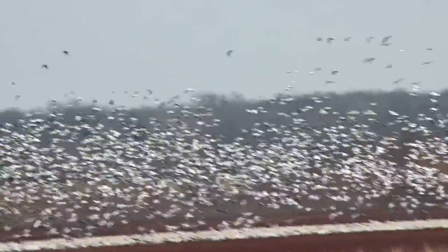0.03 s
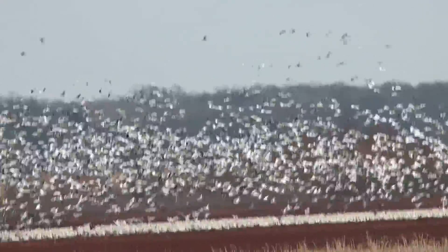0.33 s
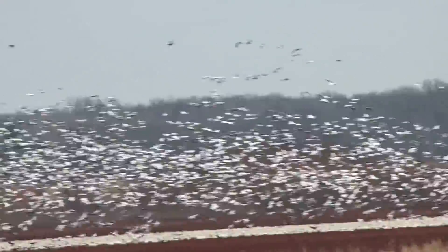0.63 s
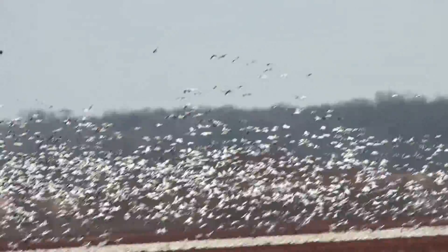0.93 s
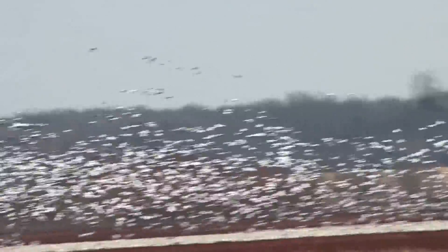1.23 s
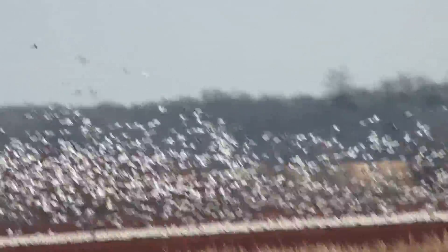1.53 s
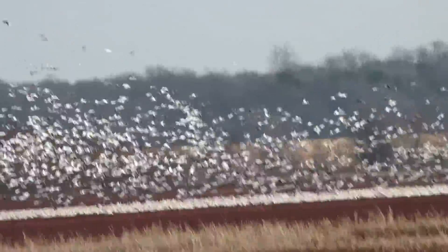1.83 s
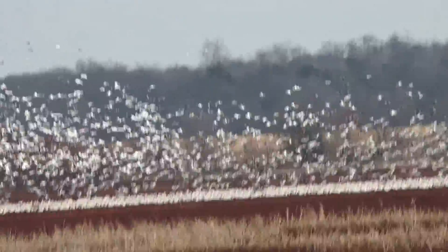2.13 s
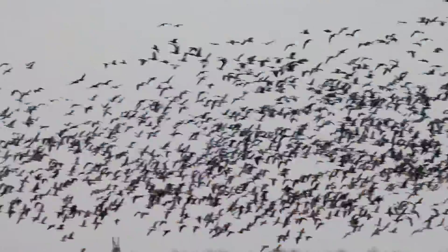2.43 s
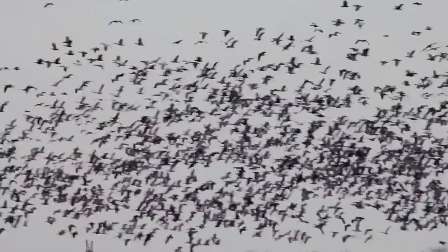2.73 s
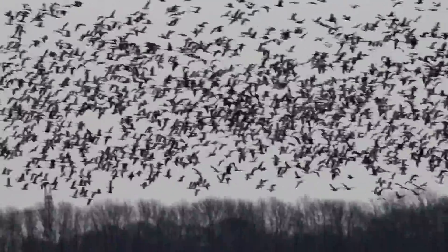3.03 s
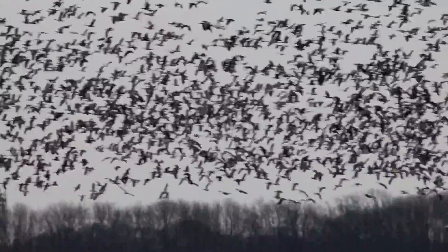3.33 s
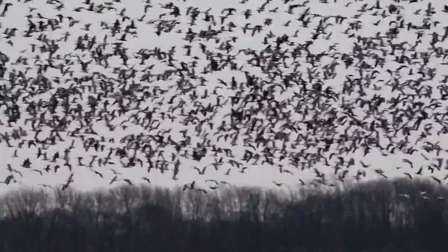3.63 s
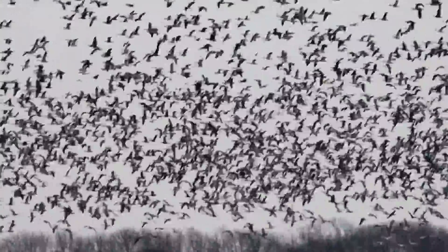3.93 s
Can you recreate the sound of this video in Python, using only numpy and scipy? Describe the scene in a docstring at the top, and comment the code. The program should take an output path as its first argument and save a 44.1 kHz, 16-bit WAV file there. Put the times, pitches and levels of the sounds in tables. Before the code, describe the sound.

Hundreds of geese yelp and honk outdoors, far away at first, with faint road noise and tyre whine. Then the flock is abruptly close and loud, above a low engine drone and a few wind gusts on the microphone.

```python
"""Open fields under a huge flock of snow geese, heard from two places with a short silence between.
Far off, hundreds of harmonic yelps merge into a soft wash, with faint peeps of small birds, road noise
and the sinking tyre whine of a passing vehicle. Nearly overhead, the calls add up to a loud roar, mostly
from the right, over the firing tones of an engine and light wind on the microphone."""
import sys
import numpy as np
from scipy import signal
from scipy.fft import rfft, irfft
from scipy.io import wavfile
from scipy.ndimage import uniform_filter1d

SR = 44100
rng = np.random.default_rng(int(sys.argv[2]) if len(sys.argv) > 2 else 0)


def wav_record(signal):
    """Record a signal, one row per channel, as 16-bit PCM in the file named by sys.argv[1]."""
    frames = np.transpose(np.atleast_2d(signal))
    bounded = np.clip(frames, -1, 1)
    # unit amplitude maps onto the largest positive 16-bit level
    quanta = np.round(bounded * 32767).astype(np.int16)
    wavfile.write(sys.argv[1], SR, quanta)


N = 176400
T, FREQS = np.arange(N) / SR, np.maximum(np.fft.rfftfreq(N, 1 / SR), 1)
FAR_END_S, NEAR_START_S = 2.459, 2.527
GOOSE_HZ, CALL_S, RASP_HZ, BLUR_HZ = 721.7, .085, 400, 3000


def call(length_s, hz, arch, slide, rasp):
    """Frequency modulation: phase and envelope of one call whose pitch arches, slides and jitters."""
    u = np.linspace(0, 1, max(int(length_s * SR), 2))
    hump = np.sin(np.pi * u ** 0.699)  # quick rise, slower fall
    pitch = hz * (1 + arch * (hump - 1) + slide * (u - .5) + .016 * rasp[:len(u)])
    return 2 * np.pi * np.cumsum(pitch) / SR, hump


def flock(start_s, end_s, spread_db, wash_db, count):
    """Incoherent superposition: geese at many pitches and distances blur into a flat spectrum."""
    out, rasp = np.zeros((2, 3 * N)), drift(118)
    chance, voices = rng.random((count, 3)), rng.standard_normal((count, 4))
    for k, ((when, nearness, offset), (pitch, length, arch, slide)) in enumerate(zip(chance, voices)):
        phase, envelope = call(CALL_S * np.exp(0.2526 * length), GOOSE_HZ * np.exp(.27 * pitch),
                               0.11 * (1 + .5 * arch), 0.0607 * slide, rasp[int(offset * N / 2):])
        pulses = np.sin(phase) / (1.5 - 1.414 * np.cos(phase))  # each harmonic 3 dB below the last
        at = N + int((start_s + (end_s - start_s) * (k + when) / count) * SR)
        out[k % 2, at:at + len(phase)] += pulses * envelope * from_db(spread_db * nearness ** 2)
    chorus = rfft(out[:, N:2 * N])
    power = uniform_filter1d(np.mean(np.abs(chorus) ** 2, axis=0), size=1200)
    flat = irfft(chorus / np.sqrt(np.abs(power) + 1e-6 * power.max()), N)
    flat /= flat[:, max(int(start_s * SR), 0):int(end_s * SR)].std()
    # Share of the power in distinct calls; noise stands for the rest of the flock.
    distinct = 1 / (1 + from_db(wash_db) ** 2) / (1 + (FREQS / BLUR_HZ) ** 4)
    return irfft(np.sqrt(distinct) * rfft(flat) + np.sqrt(1 - distinct) * rfft(noise()), N)


# Spectrum of the flock overhead (frequency [Hz], spectral density [dB])
NEAR_FLOCK_SPECTRUM = [(350, -79), (490, -69), (600, -60), (650, -60.5), (740, -55.5), (830, -55.5),
                       (900, -53), (1080, -58), (1400, -55), (1650, -55.5), (1850, -54), (2080, -60),
                       (2400, -62), (2700, -72), (3150, -79), (3600, -80.5), (5000, -89), (6000, -92.5),
                       (7000, -102), (10000, -117)]
# Envelopes of the whole flock and of its treble (time [s], level [dB])
NEAR_FLOCK_SWELL = [(2.55, -.5), (2.87, -2), (3.0, 0.25), (3.14, -1.1), (3.25, .8), (3.35, -0.5),
                    (3.47, -1.6), (3.7, -2), (4, -2.5)]
TREBLE_SWELL = [(2.55, -3.7), (2.8, -0.5), (3.05, -0.5), (3.17, 0.2), (3.25, -0.5), (3.34, -1.5),
                (3.48, -1.8), (3.7, 0.8), (3.87, 0.5), (4, 2)]


def near_flock(treble_hz=1900):
    """Spectral shaping: a loud, bright chorus whose treble also swells on its own."""
    chorus = flock(NEAR_START_S - CALL_S, N / SR, spread_db=12.5, wash_db=-2.5, count=1000)
    geese = stereo(chorus, NEAR_FLOCK_SPECTRUM, NEAR_FIELD)
    treble = irfft(rfft(geese) / (1 + (treble_hz / FREQS) ** 20), N)
    return swell(NEAR_FLOCK_SWELL) * (geese + (swell(TREBLE_SWELL) - 1) * treble)


# Spectrum of the distant flock (frequency [Hz], spectral density [dB])
FAR_FLOCK_SPECTRUM = [(350, -95), (500, -87), (700, -83.5), (900, -81.5), (1100, -85), (1620, -85.5),
                      (1800, -83), (1950, -83.5), (2070, -94), (2400, -99), (2700, -105), (4000, -114)]
# Its envelope (time [s], level [dB])
FAR_FLOCK_SWELL = [(0, 0), (.6, 1), (1.3, .5), (1.7, -0.5), (2.45, -0.5)]


def far_flock():
    """Attenuation with distance: the chorus arrives as a soft, dull wash."""
    chorus = flock(-CALL_S, FAR_END_S, spread_db=13.5, wash_db=0.5, count=900)
    return swell(FAR_FLOCK_SWELL) * stereo(chorus, FAR_FLOCK_SPECTRUM, FAR_FIELD)


# Calls that stand out (time [s], duration [s], second harmonic [Hz], its level on the right [dB],
# fundamental relative to it [dB], left minus right [dB])
YELPS = [(0.897, .11, 1960, -60, -3, -6), (1.135, .08, 2430, -61.5, -3, -2),
         (1.34, 0.089, 1834, -61.5, 6, -4), (1.388, 0.065, 2120, -70, -5, -3),
         (1.70, 0.08, 2600, -68, -5, -3), (1.998, 0.073, 1987, -54, -7, -1.5),
         (2.02, 0.077, 2380, -68, -5, -4), (2.586, 0.044, 1814, -40, 7, -6),
         (2.725, 0.065, 1612, -39.5, 8.5, -8), (2.73, 0.052, 1879, -38, 5.5, -7),
         (2.8, 0.056, 1825, -31, -18, -9), (2.939, 0.071, 1810, -32, 1, -10),
         (2.99, 0.056, 1725, -29.5, -3, -10), (3.19, 0.12, 2187, -33, -6, -11),
         (3.222, 0.064, 1710, -28, -2, -12), (3.31, .06, 1898, -28.5, -4, -11),
         (3.385, .06, 1625, -40, 8, -9), (3.841, 0.048, 1762, -32.5, -6, -10),
         (3.819, 0.12, 2260, -36.5, -1, -15)]


def yelps(arch=0.017, third_db=-26, hoarseness=1.9):
    """Harmonic series: nearer geese are shrill on the second harmonic or honk on the fundamental."""
    out = np.zeros((2, 2 * N))
    for s, length_s, hz, db, fundamental_db, pan_db in YELPS:
        phase, envelope = call(length_s, hz / 2, arch, 0, hoarseness * drift(RASP_HZ))
        harmonics = from_db([fundamental_db, 0, third_db])
        voice = sum(gain * np.sin(k * phase) for k, gain in enumerate(harmonics, 1))
        at = int(s * SR)
        out[:, at:at + len(phase)] += from_db([[db + pan_db], [db]]) * np.sqrt(2) * envelope * voice
    return out[:, :N]


# Spectrum of the engine's rumble (frequency [Hz], spectral density [dB])
RUMBLE_SPECTRUM = [(20, -94), (65, -73), (100, -56.5), (170, -55), (240, -54.5), (300, -65.5), (400, -67),
                   (600, -74), (1200, -100)]
# Envelopes of the rumble and the drone (time [s], level [dB])
RUMBLE_SWELL = [(2.55, -5), (2.75, 2.5), (2.9, -2), (3.2, 0), (3.4, 0), (3.62, 1), (4, 0)]
DRONE_SWELL = [(2.55, -10), (2.9, -4.5), (3.45, -1.5), (3.7, 4), (4, 3.5)]


def engine(firing_hz=45.26, orders=(2, 3, 5), levels_db=(-43, -38, -49.5)):
    """Periodic excitation: multiples of the firing rate drone inside a broad rumble."""
    drone = sum(tone(firing_hz * k, db, waver=0.29, waver_hz=3.2) for k, db in zip(orders, levels_db))
    rumble = stereo(noise(), RUMBLE_SPECTRUM, NEAR_FIELD)
    return swell(DRONE_SWELL) * drone + swell(RUMBLE_SWELL) * rumble


# Tyre whine (time [s], lower tone's frequency [Hz], lower tone's level [dB], upper tone's level [dB])
TYRE_WHINE = [(0, 402.3, -66, -51), (.15, 401, -65, -54), (.35, 399.3, -64, -65.5), (.7, 396.5, -58, -67),
              (1.0, 390, -54.3, -57.5), (1.25, 387.2, -52, -65.5), (1.5, 381, -58.3, -65.5),
              (1.9, 377, -59.5, -72), (2.45, 374.5, -58, -65)]
# Spectrum of the vehicle's rush (frequency [Hz], spectral density [dB])
RUSH_SPECTRUM = [(200, -100), (320, -91), (500, -80), (650, -87), (1000, -105)]
# Its envelope (time [s], level [dB])
RUSH_SWELL = [(0, -0.5), (.45, -0.5), (.75, -13), (1.2, 3.5), (1.55, -8), (2.45, -34)]


def vehicle(upper_ratio=1.687):
    """Frequency glide: two tyre tones sink together in passing, with a rush at the nearest point."""
    hz, lower_db, upper_db = in_time(TYRE_WHINE)
    lower = tone(hz, lower_db, waver=0.13, waver_hz=15)
    upper = tone(hz * upper_ratio, upper_db, waver=0.35, waver_hz=15)
    return lower + upper + swell(RUSH_SWELL) * stereo(noise(), RUSH_SPECTRUM, FAR_FIELD)


# Spectrum of the wind (frequency [Hz], spectral density [dB])
WIND_SPECTRUM = [(20, -77), (50, -65.5), (100, -57), (250, -86)]
# Its gusts (time [s], level [dB])
WIND_GUSTS = [(2.55, -15), (3.35, -13), (3.53, -8), (3.62, 8), (3.71, -5), (3.8, 6.5), (3.9, -7), (4, -4)]


def wind():
    """Turbulence: gusts on the microphone make low-frequency pressure noise."""
    return swell(WIND_GUSTS) * stereo(noise(), WIND_SPECTRUM, NEAR_FIELD)


# Spectrum of the road (frequency [Hz], spectral density [dB])
ROAD_SPECTRUM = [(20, -91), (50, -81.5), (72, -74), (110, -75), (150, -78), (200, -79.8), (310, -82.5),
                 (480, -82.5), (800, -92), (1500, -110)]


def road():
    """Stationary noise: the road is a low murmur of constant level."""
    return stereo(noise(), ROAD_SPECTRUM, FAR_FIELD)


# Notes of small birds (time [s], duration [s], frequency [Hz], level [dB], rasp over the flock's [ratio])
PEEPS = [(0.823, 0.02, 3900, -69, 7), (1.033, .045, 3850, -69, 5.6), (1.15, .09, 3080, -72, 2),
         (1.23, .09, 3100, -72, 2), (1.31, .09, 3200, -74, 3.6)]


def peeps(arch=.01):
    """Frequency jitter: it broadens the thin, level notes of small birds and makes some hoarse."""
    out = np.zeros(N)
    for s, length_s, hz, db, rasp in PEEPS:
        phase, envelope = call(length_s, hz, arch, 0, rasp * drift(RASP_HZ))
        at = int(s * SR)
        out[at:at + len(phase)] += from_db(db) * np.sqrt(2) * envelope * np.sin(phase)
    return out


# Spectrum of a tick in the field (frequency [Hz], spectral density [dB])
TICK_SPECTRUM = [(8000, -120), (9500, -104), (12000, -104), (14000, -118)]
# Its envelope (time [s], level [dB])
TICK_SWELL = [(1.04, -50), (1.07, 3), (1.1, -1), (1.13, -50)]


def tick():
    """Band-limited transient: a brief burst of high noise is heard as a faint tick."""
    return swell(TICK_SWELL) * stereo(noise(), TICK_SPECTRUM, FAR_FIELD)


# Spectra of the hiss at each place (frequency [Hz], spectral density [dB])
FAR_HISS = [(1000, -104), (2800, -100), (4000, -102), (7000, -105.5), (11000, -106.5), (13000, -110.9),
            (15000, -117.5)]
NEAR_HISS = [(3000, -104), (7500, -98), (11000, -99.5), (13000, -103.2), (15000, -115.7)]
# Envelope of the near hiss (time [s], level [dB])
NEAR_HISS_SWELL = [(2.55, -1.3), (3.0, 0.033), (3.6, 1), (4, 1)]


def hiss(near):
    """Noise floor: faint broadband treble, steady at the far place and rising a little at the near one."""
    if near:
        return swell(NEAR_HISS_SWELL) * stereo(noise(), NEAR_HISS, NEAR_FIELD)
    return stereo(noise(), FAR_HISS, FAR_FIELD)


# Sound field at the two microphone ports, for each place
# (frequency [Hz], coherence [0-1], left phase lead [rad], left minus right [dB])
FAR_FIELD = [(60, .88, 0, .2), (250, .9, -.1, 0), (400, .92, .4, 0), (700, .72, .4, 0), (1200, .45, 0, -2),
             (1800, .52, .8, -3), (2300, .1, 2.4, -2), (10000, .1, 2.6, 0)]
NEAR_FIELD = [(50, .7, -.4, -4.5), (130, .88, -.35, -1), (330, .76, .1, -.3), (450, .55, -1.3, -1.5),
              (620, .83, -1.35, -5), (830, .89, -1.6, -6.2), (1500, .82, -2.4, -8),
              (1900, .63, -1.9, -10.3), (2300, .83, -2.5, -10.3), (3200, .58, -3.4, -4),
              (5000, .45, -6.3, -2), (7000, .1, -8, -1), (10000, .1, -8, -2), (13000, .1, -8, -8)]


def stereo(pair, spectrum, field):
    """Partial coherence: two unrelated flat signals are coloured and shared between left and right."""
    coherence, lead, pan_db = in_pitch(field)
    coherence = np.clip(coherence, 0, 1)
    common, apart = rfft(pair) * np.sqrt([1 + coherence, 1 - coherence])
    left = (common + apart) * from_db(pan_db) * np.exp(1j * lead)
    right = common - apart
    # 12 dB per octave beyond the ends of the spectrum
    skirts = (np.minimum(FREQS / spectrum[0][0], 1) * np.minimum(spectrum[-1][0] / FREQS, 1)) ** 2
    gain = from_db(in_pitch(spectrum)[0]) * skirts * np.sqrt(SR / 2 / (1 + from_db(pan_db) ** 2))
    return irfft(gain * np.array([left, right]), N)


def tone(hz, db, waver, waver_hz):
    """Scintillation: a machine's tone wavers in amplitude and phase on its way through the air."""
    phase = 2 * np.pi * np.cumsum(hz * np.ones(N)) / SR
    in_phase = (1 + waver * drift(waver_hz)) * np.sin(phase)
    quadrature = waver * drift(waver_hz) * np.cos(phase)
    return from_db(db) * np.sqrt(2 / (1 + 2 * waver ** 2)) * (in_phase + quadrature)


def drift(corner_hz):
    """Random fluctuation: low-passed noise of unit variance."""
    slow = irfft(rfft(rng.standard_normal(N)) / (1 + (FREQS / corner_hz) ** 2), N)
    return slow / slow.std()


def noise():
    """White noise: two uncorrelated channels."""
    return rng.standard_normal((2, N))


def from_db(db):
    """Decibel law: level to amplitude ratio."""
    return 10 ** (np.asarray(db) / 20)


def in_time(rows):
    """Linear interpolation: each column at every sample."""
    s, *columns = np.transpose(rows)
    return [np.interp(T, s, c) for c in columns]


def in_pitch(rows):
    """Log-frequency interpolation: each column at every frequency."""
    hz, *columns = np.transpose(rows)
    return [np.interp(np.log(FREQS), np.log(hz), c) for c in columns]


def swell(rows):
    """Amplitude envelope: a level curve as gain."""
    return from_db(in_time(rows)[0])


def scene(decay_s=.004, fade_in_s=.032):
    """Superposition: sources add at each place; the far one dies away, then the near one comes in."""
    far = far_flock() + peeps() + tick() + vehicle() + road() + hiss(near=False)
    near = near_flock() + wind() + engine() + hiss(near=True)
    going = np.exp(-np.maximum(T - FAR_END_S, 0) / decay_s)
    coming = np.clip((T - NEAR_START_S) / fade_in_s, 0, 1) ** 2
    return going * far + coming * near + yelps()


def record(dry):
    """Band limiting: an elliptic low-pass cuts the top steeply."""
    cutoff_hz = 15700
    return signal.sosfilt(signal.ellip(10, .1, 80, cutoff_hz, fs=SR, output="sos"), dry + 1e-18)


dry = scene()
out = record(dry)
wav_record(out)
```